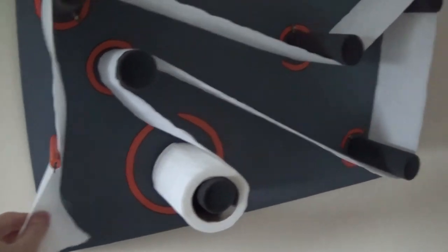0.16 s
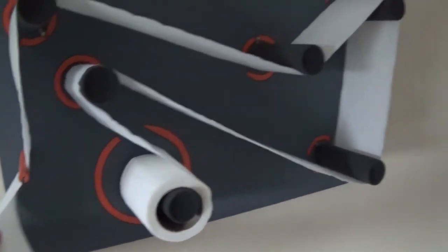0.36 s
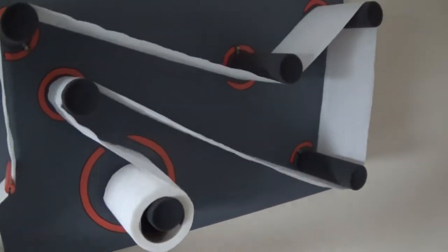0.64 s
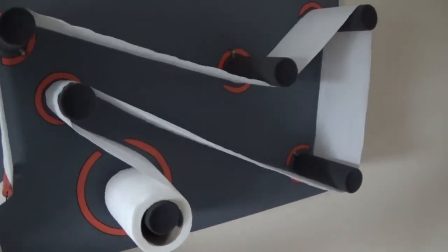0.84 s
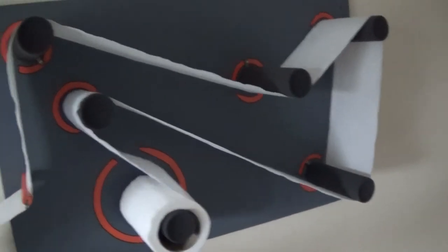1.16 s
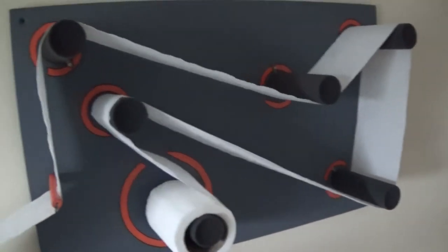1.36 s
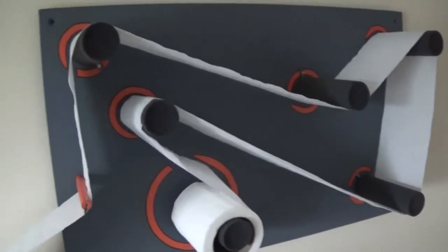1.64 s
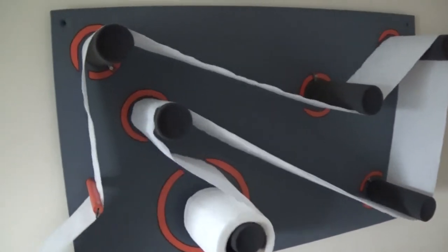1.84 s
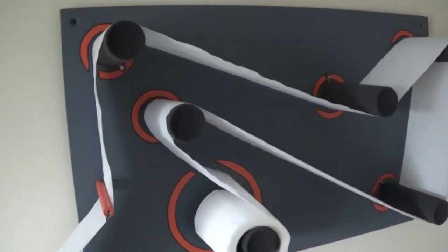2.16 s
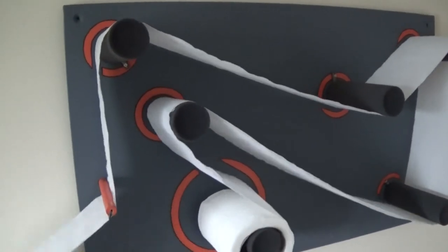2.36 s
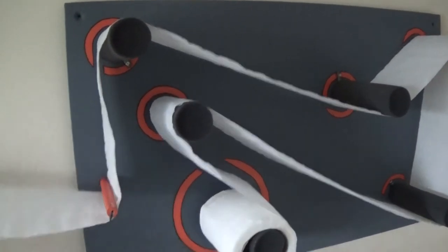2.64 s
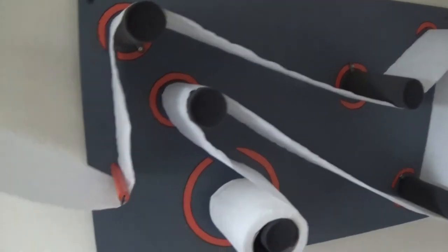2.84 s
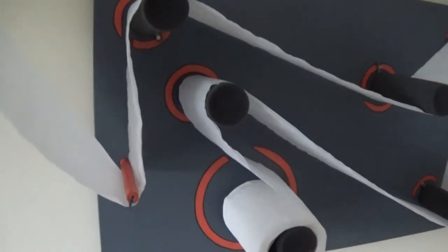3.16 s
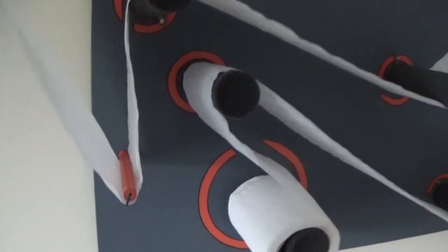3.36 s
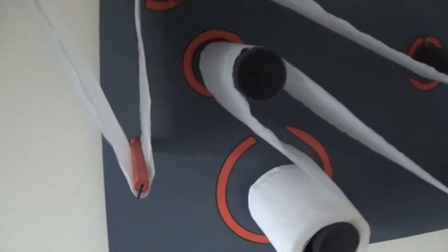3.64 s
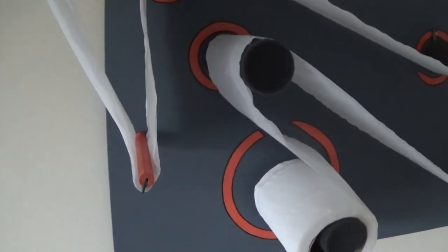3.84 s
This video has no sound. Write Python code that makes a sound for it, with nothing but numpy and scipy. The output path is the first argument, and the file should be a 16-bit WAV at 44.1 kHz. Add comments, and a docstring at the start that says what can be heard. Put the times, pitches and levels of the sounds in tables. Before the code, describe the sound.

Tissue paper pulled off a roll over smooth pegs starts faintly, swells by 0.4 s into an airy, fluttering hiss strongest around 0.8 s, and fades after 2.2 s. The cardboard core rubs dully, then knocks hollowly between 2.35 and 2.9 s amid small crackles. After a lull, crisp creases begin at 3.1 s, growing dense and loudest from 3.6 to 4 s. Close, small dry room, steady soft hiss.

```python
"""A long strip of tissue paper is pulled off its roll and over smooth pegs, close to a small camera indoors.
From the start the strip hisses: friction noise in narrow bands that swell and flicker, over a steady hush.
Soon the cardboard core rubs on its peg, and as it runs out it knocks too: noise drives its resonances.
Among the knocks come the first crackles; then fingers crease the paper into many sharp ones,
each a short noise burst with one snap, over a bed of finer creases made of random clicks."""
import sys
import numpy as np
from scipy import signal
from scipy.fft import rfft, irfft
from scipy.io import wavfile
from scipy.ndimage import uniform_filter1d

SR = 44100
rng = np.random.default_rng(int(sys.argv[2]) if len(sys.argv) > 2 else 0)


def waveform_to_disk(signal):
    """Save audio, clipped to [-1, 1], as 16-bit WAV at the path in sys.argv[1]."""
    frames = np.transpose(np.atleast_2d(signal))
    scaled = np.clip(frames, -1, 1) * 32767
    samples = np.round(scaled).astype(np.int16)
    wavfile.write(sys.argv[1], SR, samples)


N = 176400  # samples, 4 s

# Spectrum of the steady hiss of room and microphone. Each row: frequency in Hz, relative density in dB.
HUSH_SPECTRUM = [(25, -19), (100, -21), (200, -11.5), (460, -4.5), (900, -6), (2000, -9), (5000, -10.5),
                 (10000, -12), (13000, -14.5), (16000, -20.5)]
# Unlike part of the near sound in the two channels. Each row: frequency in Hz, gain in dB.
SIDE_GAIN = [(60, -9), (200, -23), (700, -10.5), (2400, -8), (4400, -9.5), (8000, -10.5), (15000, -15)]
# Excess of the left channel over the right. Each row: frequency in Hz, level difference in dB.
LEFT_EXCESS = [(100, 0.5), (500, 0.5), (2000, 3), (8000, 2.5), (14000, -5)]
# Resonances of the cardboard core. Each row: frequency in Hz, width before widening in Hz, gain in dB.
CORE_MODES = [(840, 77, -3), (1309, 33, -2), (1604, 43, -4.5), (2140, 85, -9), (2330, 39, -16),
              (3280, 83, -11)]
# The core rubbing on its peg. Each row: time in seconds, level in dB.
RUB_LEVEL = [(.25, -60), (.45, -58), (.9, -55), (1.2, -54), (1.7, -58), (2.1, -59), (2.3, -86),
             (2.37, -51.5), (2.5, -62), (2.55, -50.5), (2.63, -51.5), (2.7, -52), (2.8, -56.5),
             (2.9, -58.5), (3.05, -60.5), (3.2, -66), (3.5, -68)]
# Knocks of the core. Each row: start in seconds, level in dB, crack re knock in dB, bass gain in dB.
CORE_KNOCKS = [(2.361, -44.5, 10.5, 4), (2.4395, -26, -11.5, -9.5), (2.451, -41.5, -10, 8),
               (2.5285, -30.5, -0.5, -0.5), (2.583, -50, 14.5, -4), (2.627, -35.5, -2, -3),
               (2.859, -29.5, -2, 0), (2.877, -44.5, 10, 1)]
# Spectrum of creasing paper. Each row: frequency in Hz, relative density in dB.
CREASE_SPECTRUM = [(60, -33), (150, -20), (400, -10.5), (700, -4.5), (1500, -3.5), (2200, -4), (4300, -5.5),
                   (6400, -9), (9400, -1.5), (12000, -8), (16000, -24.5)]
# The fine crumpling. Each row: time in seconds, level before the band gains in dB.
CRUMPLE_LEVEL = [(3.2, -68), (3.26, -59.5), (3.29, -54), (3.33, -65), (3.4, -63), (3.45, -55.5),
                 (3.51, -56), (3.55, -55), (3.585, -57), (3.6, -49.5), (3.63, -42.5), (3.65, -49),
                 (3.68, -38.5), (3.7, -51.5), (3.77, -54.5), (3.8, -55.5), (3.86, -53.5), (3.885, -56),
                 (3.9, -33), (3.96, -37.5), (3.985, -45), (4, -31)]
# Single creases. Each row: start in seconds, level in dB, bass gain in dB, treble gain in dB,
# rise in seconds, decay in seconds.
CREASES = [(2.372, -39, -12, 9, 0.001, 0.002), (2.4325, -34, -12, 5, 0.001, 0.0015),
           (2.6055, -40, -12, 6, 0.001, 0.0015), (2.6143, -38, -10, 2, 0.001, 0.0015),
           (2.745, -41, -10, 1, 0.0012, 0.002), (2.821, -53, -10, 6, 0.0015, 0.003),
           (2.827, -50, -10, 9, 0.0015, 0.004), (3.1074, -37.5, -10, 2.5, 0.0016, 0.0015),
           (3.1462, -33, -13, -2, 0.0012, 0.0013), (3.193, -40, -8, 1, 0.0013, 0.0022),
           (3.2104, -40, -9, 0, 0.0012, 0.0027), (3.28, -35, -3, 0, 0.001, 0.0017),
           (3.2877, -33.5, 1, 3.5, 0.0012, 0.002), (3.2978, -34.5, -6, -1, 0.0016, 0.0022),
           (3.3854, -38.5, -9, 0, 0.0012, 0.0019), (3.4318, -44, -10, 6, 0.0012, 0.0017),
           (3.4548, -18.5, -31, -5.5, 0.0011, 0.0011), (3.487, -31.5, -9, 0, 0.0016, 0.002),
           (3.528, -34.5, -7, 2, 0.0011, 0.002), (3.5535, -30, -17, -7, 0.0014, 0.0021),
           (3.595, -31, -14, -1, 0.001, 0.0044), (3.6106, -14, 0.5, -4, 0.0011, 0.0021),
           (3.6276, -24, 0, 1, 0.0021, 0.0025), (3.6456, -22, -9, -4, 0.0011, 0.0025),
           (3.6568, -20, -2, -3, 0.0013, 0.0024), (3.66, -12, -4.5, -3, 0.001, 0.0018),
           (3.674, -16.5, -5, 3, 0.0008, 0.0014), (3.7068, -36.5, 1, 8, 0.00088, 0.0018),
           (3.7295, -39, -10, 7, 0.0011, 0.002), (3.7496, -18.5, -7, -3.5, 0.0018, 0.0013),
           (3.836, -28, -7, 1.5, 0.0011, 0.0023), (3.8576, -32, -12, 10, 0.0012, 0.0016),
           (3.8675, -29, -3, 4, 0.0011, 0.0018), (3.887, -21.5, -2, 2, 0.00062, 0.003),
           (3.8893, -9.5, -1.5, 0.5, 0.0006, 0.0018), (3.8923, -20, -3, 7, 0.0021, 0.0025),
           (3.895, -12.5, 4, -5, 0.00093, 0.001), (3.9063, -10.5, -5, 4, 0.001, 0.00087),
           (3.908, -13, 0, -12, 0.001, 0.0024), (3.9132, -16, 5, -2, 0.0013, 0.0019),
           (3.93, -24, 9, 1, 0.0018, 0.0025), (3.9422, -14, 3, 2.5, 0.0022, 0.0024),
           (3.9502, -8.5, 2, -6, 0.001, 0.00069), (3.9885, -35, -7, 3, 0.001, 0.002),
           (3.9924, -10, -5.5, -3.5, 0.0011, 0.0019)]
# Spectrum of the sliding fibres. Each row: frequency in Hz, relative density in dB.
SLIDE_SPECTRUM = [(60, -32), (127, -30), (210, -13), (480, -9), (560, -3.5), (1070, -1.5), (2400, -0.5),
                  (5450, -7.5), (7500, -7.5), (9700, -3.5), (12000, -11.5), (14800, -23.5), (16000, -33)]
# Taut spans of paper. Each row: time in seconds, pitch in Hz, boost at that pitch in dB.
TAUT_SPAN = [(.3, 1600, -1), (.4, 1580, 11), (.53, 1600, 7), (.6, 2110, 1), (.7, 2100, -1.5),
             (.76, 2250, 3), (.92, 2360, 2.5), (.98, 1450, 0), (1.1, 1400, 4), (1.2, 1240, 6.5),
             (1.4, 1300, -1), (1.6, 1400, 2.5), (1.9, 1610, 6.5), (2.05, 2800, 2), (2.2, 2600, 3),
             (2.3, 1550, -5)]
# The pull. Each row: time in seconds, level of the middle band in dB, bass re that in dB, treble re that in dB.
PULL_LEVEL = [(0, -61.5, 2, 5.5), (.2, -58, 1, 1.5), (.33, -55.5, 2.5, 2), (.43, -48.5, -1, -3.5),
              (.6, -48.5, 1, -2), (.7, -47, -0.5, -1.5), (.77, -44, -0.5, -5), (.82, -46.5, -2, -4),
              (.89, -47, -9, -2), (.95, -48, -1.5, -4), (1.08, -46.5, -1, -3.5), (1.2, -49, 5.5, 2),
              (1.3, -49, 1.5, 0.5), (1.5, -51, 3, 3), (1.66, -48, 3.5, 1.5), (1.78, -54, 4, 3),
              (1.95, -52.5, 1, 4), (2.14, -48.5, -2, 2.5), (2.26, -57.5, 6, 3.5), (2.36, -56.5, -2, 2.5),
              (2.5, -61.5, 10, -1), (2.56, -56, 2.5, 3), (2.64, -54.5, 5, 1), (2.68, -65.5, -6, 2),
              (3.0, -67, 4, 1)]

BASS_HZ, TREBLE_HZ = 1473, 6000  # crossovers of the three bands
HUSH_DB = -58
ROOM_DB, ROOM_T60_S = -20, 0.068
SCATTER_S, SHIFTS_PER_S = 0.0031, 25  # decay of close reflections, rate of their change
TOP_HZ = 15900
RUB_TOP_HZ, RUB_WIDEN = 1800, 2.8  # widening multiplies the mode widths
KNOCK_WIDEN, THUD_HZ, THUD_DB, CRACK_LOW_HZ = 2, 480, -10, 700
GRAINS_PER_S, CREASE_S = 1500, .00008  # rate and decay of the fine creases
CRUMPLE_BASS_DB, CRUMPLE_TREBLE_DB = 2.5, 1
SPIKE_DB, CREASE_GAIN = 4., 1.286  # unevenness of a burst, its strength
SNAP_DB, SNAP_RECOIL = 13, 0.68  # snap re burst, opposite swing re snap
TAIL_DB, TAIL_S, BASS_LINGERS = -15.5, 0.012, 2.8  # the bass decay is this many times longer
JUDDER_DB, SWELL_DB, NEIGHBOUR_DB = 1, .3, .3
FLICKER_DB, SMOOTH_ABOVE_HZ = 1.6, 4500  # low-frequency flicker; it halves at this frequency
SPAN_OCTAVES = 0.13  # distance at which the boost falls to 1/e


def undb(db):
    """Amplitude ratio of a level in dB."""
    return 10 ** (np.asarray(db) / 20)


def unit(x):
    """Scale to an rms of one."""
    return x / np.sqrt(np.mean(x ** 2))


def curve(table, col=1):
    """Linear interpolation of a table column over time."""
    rows = np.array(table)
    return np.interp(np.arange(N) / SR, rows[:, 0], rows[:, col])


def at(table, hz):
    """Interpolation of a (Hz, dB) table over log frequency."""
    rows = np.array(table)
    return np.interp(np.log(hz + 1), np.log(rows[:, 0]), rows[:, 1])


def colour(x, table):
    """Minimum-phase filtering by the folded cepstrum of a (Hz, dB) table, with unit energy gain."""
    cepstrum = irfft(np.log(undb(at(table, np.fft.rfftfreq(2048, 1 / SR)))))
    cepstrum[1:1024] *= 2
    cepstrum[1025:] = 0
    h = irfft(np.exp(rfft(cepstrum)))[:1024]
    return signal.fftconvolve(x, unit(h) / np.sqrt(len(h)))[:len(x)]


def split(x):
    """Complementary crossover: bass, middle and treble add up to the whole."""
    f, spec = np.fft.rfftfreq(len(x), 1 / SR), rfft(x)
    low = irfft(spec / (1 + (f / BASS_HZ) ** 4), len(x))
    high = irfft(spec * (1 - 1 / (1 + (f / TREBLE_HZ) ** 4)), len(x))
    return low, x - low - high, high


def ring(x, hz, width):
    """Damped resonance: a pole pair whose radius follows from the bandwidth in Hz."""
    r = np.exp(-np.pi * width / SR)
    return signal.lfilter([1 - r, 0, r - 1], [1, -2 * r * np.cos(2 * np.pi * hz / SR), r * r], x)


def highpass(x, order, hz):
    """Butterworth removal of the lows."""
    return signal.sosfilt(signal.butter(order, hz, "high", fs=SR, output="sos"), x)


def walk(rate):
    """Slow random modulation: levels held 1 / rate s and slewed twice, of unit rms."""
    k = int(SR / rate)
    held = np.repeat(rng.standard_normal(N // k + 1), k)
    return unit(uniform_filter1d(uniform_filter1d(held, k), k)[:N])


def grains(per_s, spread_db):
    """Impulse noise: tiny clicks at random moments, a few of them large."""
    excess = np.minimum(rng.exponential(size=N), 3)
    return (rng.random(N) < per_s / SR) * rng.standard_normal(N) * undb(spread_db * excess)


def hush():
    """Stationary noise in sum and difference: hiss partly unlike left and right, most so in the bass."""
    mid, side = (unit(colour(rng.standard_normal(N), HUSH_SPECTRUM)) for _ in range(2))
    side = colour(side, [(60, 5.0), (150, -1.0), (4000, 2.0), (14000, -29.0)])
    return undb(HUSH_DB) * (mid + 0.41 * side * np.array([[1], [-1]]))


def room(near):
    """Diffuse reverberation: exponentially decaying noise, independent in each channel."""
    tt = np.arange(SR // 3) / SR
    echoes = rng.standard_normal((2, len(tt))) * undb(-60 * tt / ROOM_T60_S) * (tt > .004)
    wet = [signal.fftconvolve(near, e / np.linalg.norm(e))[:N] for e in echoes]
    return undb(ROOM_DB) * np.array(wet)


def stereo(near):
    """Early scattering: close reflections differ at the two ports and change as the sound moves on the strip."""
    tt = np.arange(SR // 3) / SR
    f = np.fft.rfftfreq(N, 1 / SR)
    scatter = rng.standard_normal((2, len(tt))) * np.exp(-tt / SCATTER_S)
    turn = np.pi / 2 * walk(SHIFTS_PER_S)
    gain = undb(at(SIDE_GAIN, f))
    side = 0
    for weight, s in zip((np.cos(turn), np.sin(turn)), scatter):
        side = side + irfft(rfft(near * weight) * rfft(s / np.linalg.norm(s), N) * gain, N)
    left_db = at(LEFT_EXCESS, f)
    pair = irfft(rfft(near) * undb(np.array([left_db, -left_db]) / 2), N)
    return pair + side * np.array([[1], [-1]])


def core_body(x, widen):
    """Modal superposition: the cardboard core's resonances in parallel."""
    return sum(undb(db) * ring(x, hz, width * widen) for hz, width, db in CORE_MODES)


def core_rub():
    """Friction excitation: uneven low noise makes the core hum on its peg."""
    t = np.arange(N) / SR
    fade_in = np.clip((t - RUB_LEVEL[0][0]) / 0.14, 0, 1)
    fade_out = np.clip((RUB_LEVEL[-1][0] - t) / 0.23, 0, 1)
    rough = rng.standard_normal(N) * undb(1.5 * walk(40))
    drag = signal.sosfilt(signal.butter(6, RUB_TOP_HZ, fs=SR, output="sos"), rough)
    hum = core_body(drag, RUB_WIDEN) + undb(-9.5) * ring(drag, THUD_HZ, 240.0)
    return unit(hum) * undb(curve(RUB_LEVEL)) * fade_in * fade_out


def core_knocks():
    """Impact excitation: a brief noise push rings the core's modes, with a crack on top."""
    out = np.zeros(N)
    tt = np.arange(SR // 10) / SR
    for s, db, crack_db, bass_db in CORE_KNOCKS:
        noise = rng.standard_normal(len(tt))
        push = noise * np.exp(-tt / 0.0042)
        knock = core_body(push, KNOCK_WIDEN) + undb(THUD_DB) * ring(push, THUD_HZ, 170.0)
        knock = highpass(knock, 3, THUD_HZ / 2)
        crack = colour(noise, CREASE_SPECTRUM) * np.exp(-tt / 0.006) / 3
        crack = highpass(crack, 2, CRACK_LOW_HZ)
        low, mid, high = split(knock / abs(knock).max() + undb(crack_db) * crack)
        i = int(s * SR)
        out[i:i + len(tt)] += undb(db) * (undb(bass_db) * low + mid + high)
    return out


def crumple():
    """Shot noise: many fine creases at random moments merge with noise into a bed."""
    tt = np.arange(SR // 200) / SR
    crease = rng.standard_normal(len(tt)) * np.exp(-tt / CREASE_S)
    creases = unit(np.convolve(grains(GRAINS_PER_S, 1.9), crease)[:N]) * undb(0.65 * walk(89.87))
    bed = unit(colour(creases + 0.71 * rng.standard_normal(N), CREASE_SPECTRUM))
    low, mid, high = split(bed)
    bed = undb(CRUMPLE_BASS_DB) * low + mid + undb(CRUMPLE_TREBLE_DB) * high
    fade_in = np.clip((np.arange(N) / SR - CRUMPLE_LEVEL[0][0]) / 0.084, 0, 1)
    return bed * undb(curve(CRUMPLE_LEVEL)) * fade_in


def crackles():
    """Sudden release of strain: each crease builds, snaps once and dies over a weak tail."""
    tt = np.arange(SR // 8) / SR
    out = np.zeros(N + len(tt))
    for s, db, bass_db, treble_db, rise_s, decay_s in CREASES:
        noise, size = rng.standard_normal((2, len(tt)))
        after = np.maximum(tt - rise_s, 0)
        rise = np.minimum(tt / rise_s, 1)
        shape = np.exp(-after / decay_s) + undb(TAIL_DB) * np.exp(-after / TAIL_S)
        shape *= rise ** 2
        burst = noise * undb(SPIKE_DB * np.clip(size, -2, 1.5)) * shape
        burst *= CREASE_GAIN * np.linalg.norm(shape) / np.linalg.norm(burst)
        # the snap and its opposite swing three samples later
        k = int(rise_s * SR)
        burst[[k, k + 3]] += np.sign(noise[0]) * undb(SNAP_DB) * np.array([1, -SNAP_RECOIL])
        _, mid, high = split(colour(burst / undb(SNAP_DB), CREASE_SPECTRUM))
        # the sheet's bass comes without the snap and dies more slowly
        slow = rise * np.exp(-after / (BASS_LINGERS * decay_s))
        low = split(colour(noise * slow / undb(SNAP_DB), CREASE_SPECTRUM))[0]
        i = int(s * SR)
        out[i:i + len(tt)] += undb(db) * (mid + undb(bass_db) * low + undb(treble_db) * high)
    return out[:N]


def slide():
    """Friction noise: fibres brush the pegs in narrow bands that swell together, with neighbours and alone."""
    brushing = rng.standard_normal(N) * undb(JUDDER_DB * walk(120))
    fibres = unit(brushing + 0.18 * unit(grains(600, 0.67)))
    spec, f = rfft(colour(fibres, SLIDE_SPECTRUM)), np.fft.rfftfreq(N, 1 / SR) + 1
    swell, near = walk(8), walk(8)
    span_hz, boost_db = curve(TAUT_SPAN), curve(TAUT_SPAN, col=2)
    out = 0
    for hz in 60 * 2 ** np.arange(0, 8.4, 1 / 6):
        near = .9 * near + .44 * walk(8)  # adjacent bands move alike
        share = np.cos(np.pi / 2 * np.clip(6 * np.log2(f / hz), -1, 1)) ** 2
        taut_db = boost_db * np.exp(-(np.log2(hz / span_hz) / SPAN_OCTAVES) ** 2)
        flicker_db = FLICKER_DB * walk(30.08) / (1 + hz / SMOOTH_ABOVE_HZ)
        band_db = taut_db + SWELL_DB * swell + NEIGHBOUR_DB * near + flicker_db
        out = out + irfft(spec * share, N) * undb(band_db)
    low, mid, high = split(out)
    fade_out = np.clip((PULL_LEVEL[-1][0] - np.arange(N) / SR) / 0.11, 0, 1)
    bands = low * undb(curve(PULL_LEVEL, col=2)) + mid + high * undb(curve(PULL_LEVEL, col=3))
    return bands * undb(curve(PULL_LEVEL)) * fade_out / mid.std()


def scene():
    """Superposition of the near sources, their reflections and the hush."""
    near = slide() + core_rub() + core_knocks() + crumple() + crackles()
    return stereo(near) + room(near) + hush()


def record(dry):
    """Band limitation: the camera cuts the top with a steep elliptic low-pass."""
    return signal.sosfilt(signal.ellip(10, .2, 70, TOP_HZ, fs=SR, output="sos"), dry)


dry = scene()
out = record(dry)
waveform_to_disk(out)
```